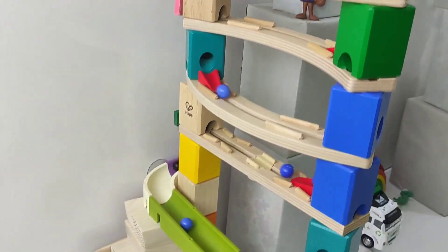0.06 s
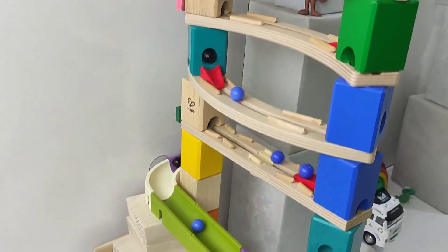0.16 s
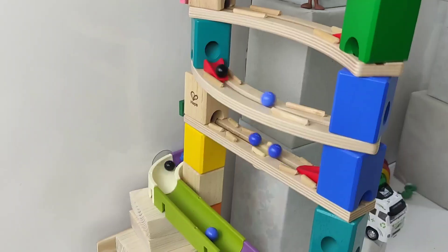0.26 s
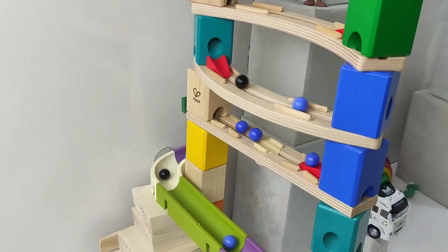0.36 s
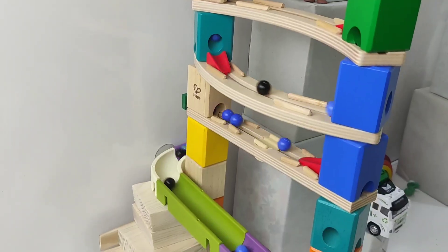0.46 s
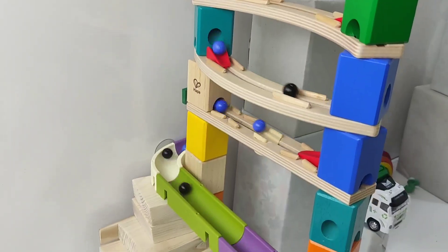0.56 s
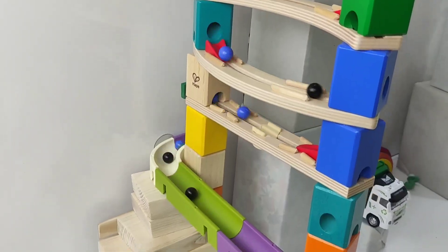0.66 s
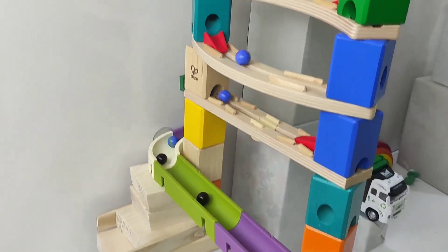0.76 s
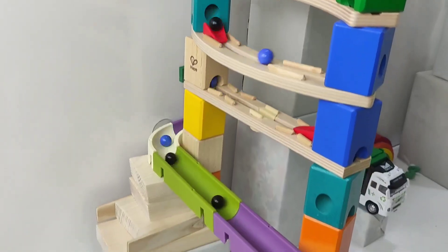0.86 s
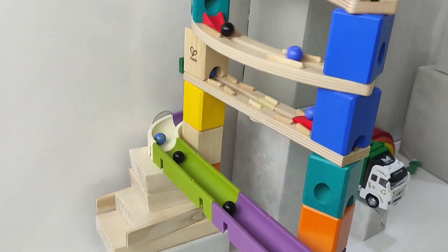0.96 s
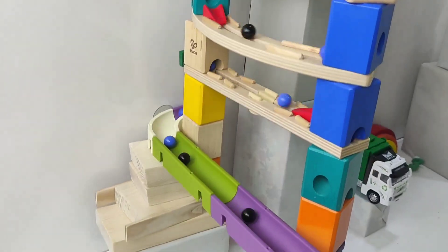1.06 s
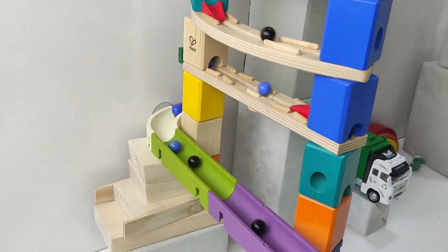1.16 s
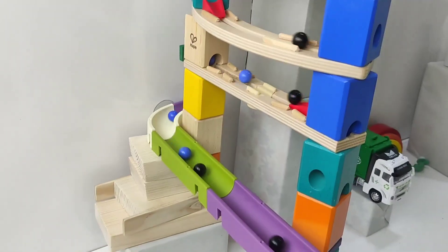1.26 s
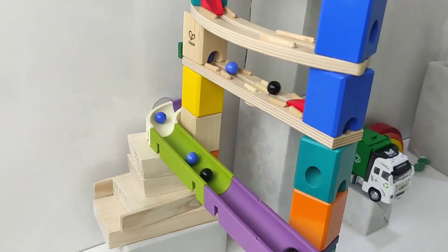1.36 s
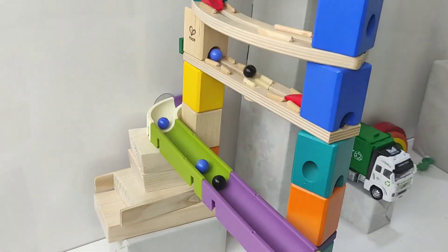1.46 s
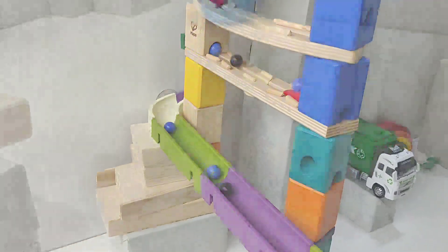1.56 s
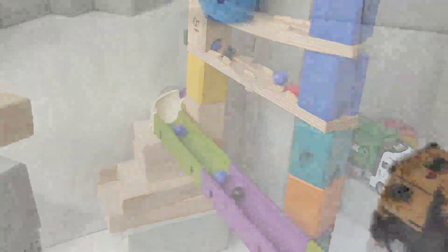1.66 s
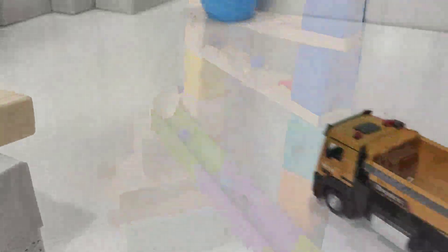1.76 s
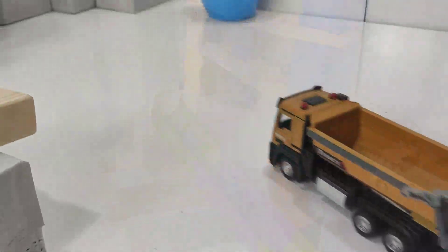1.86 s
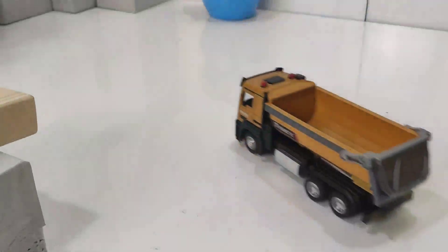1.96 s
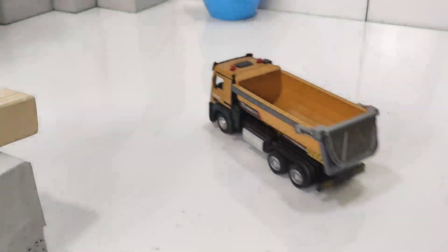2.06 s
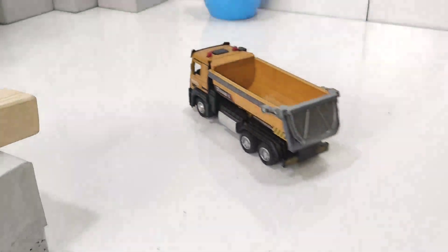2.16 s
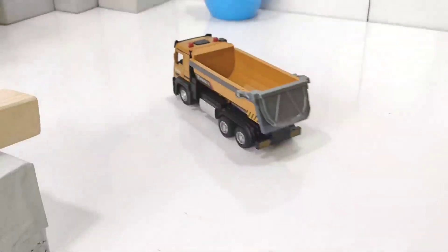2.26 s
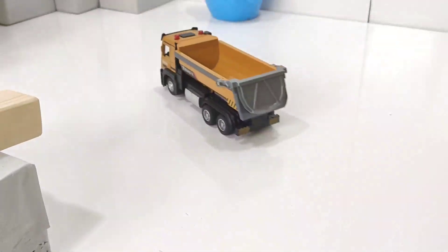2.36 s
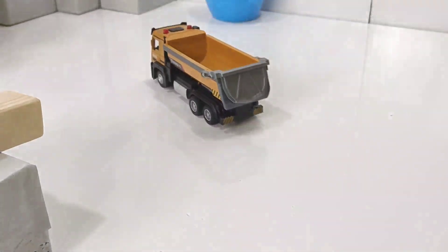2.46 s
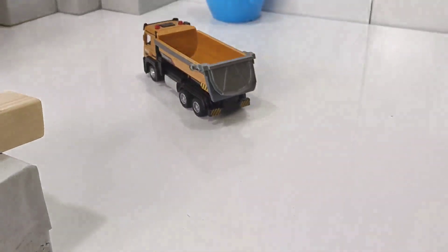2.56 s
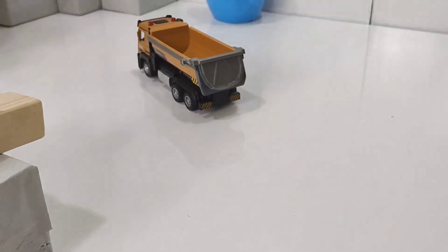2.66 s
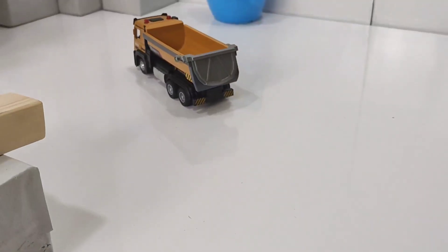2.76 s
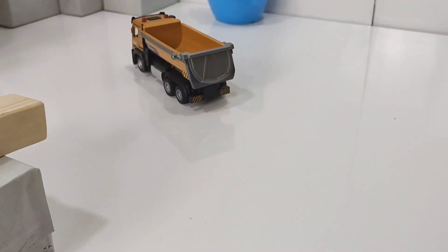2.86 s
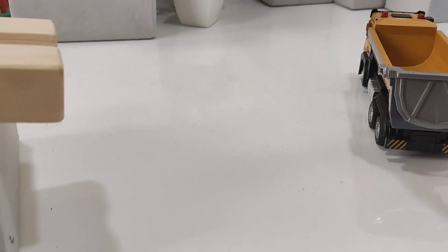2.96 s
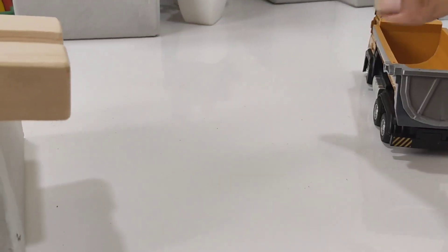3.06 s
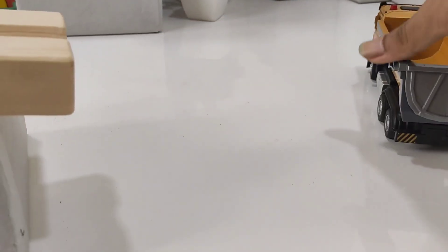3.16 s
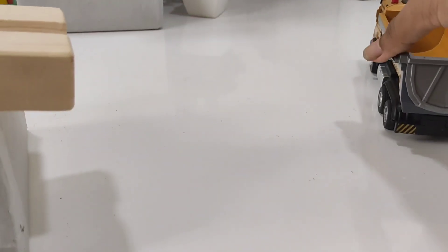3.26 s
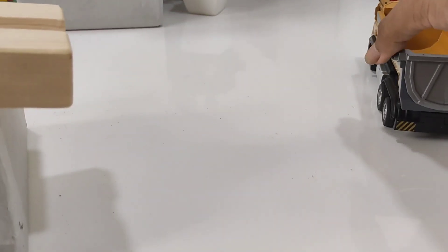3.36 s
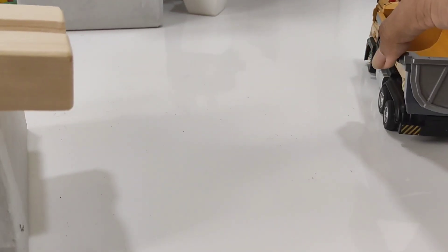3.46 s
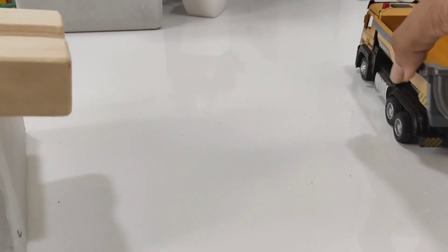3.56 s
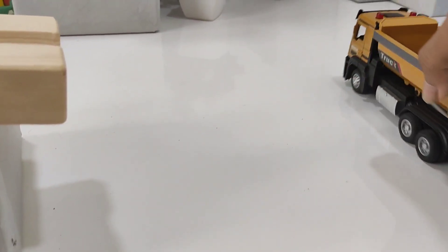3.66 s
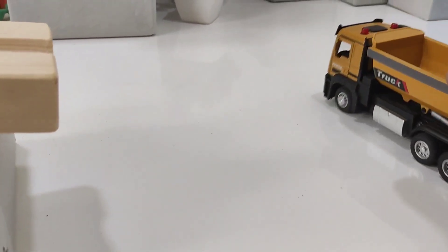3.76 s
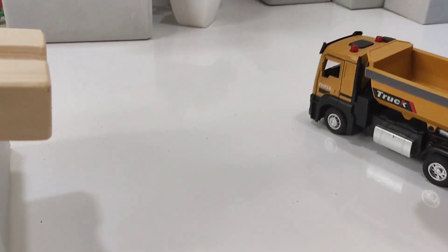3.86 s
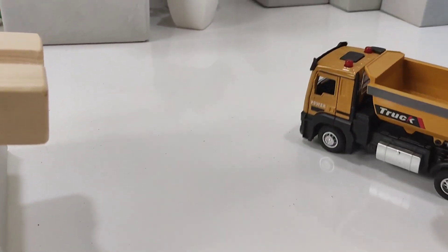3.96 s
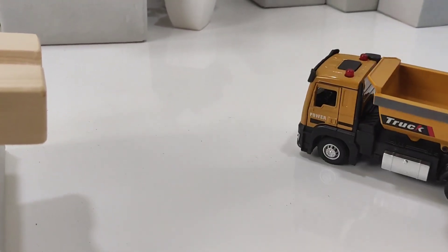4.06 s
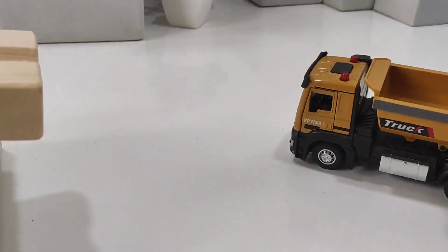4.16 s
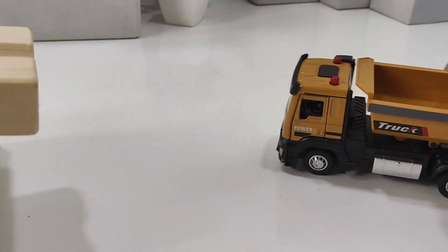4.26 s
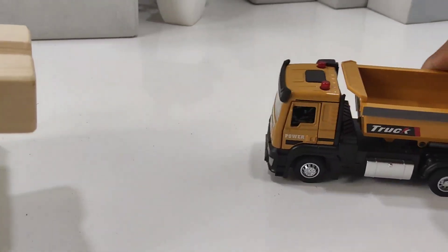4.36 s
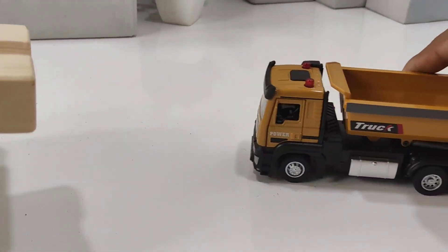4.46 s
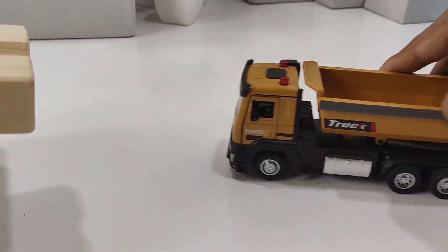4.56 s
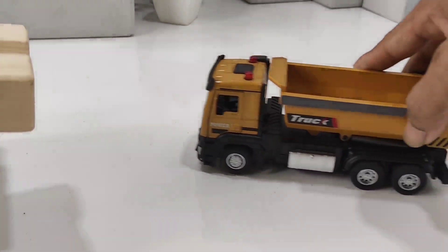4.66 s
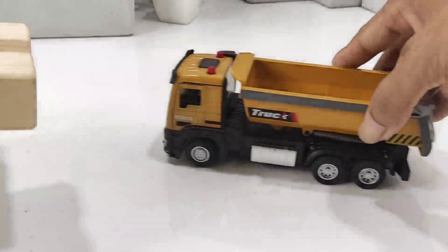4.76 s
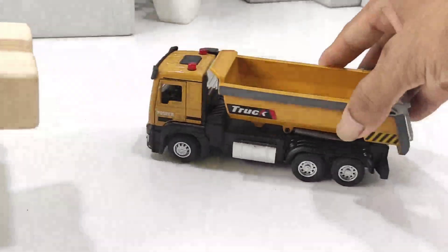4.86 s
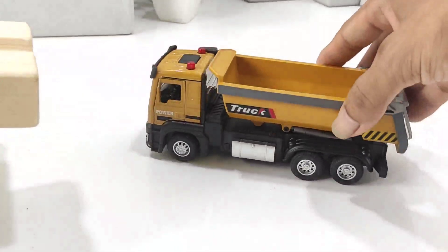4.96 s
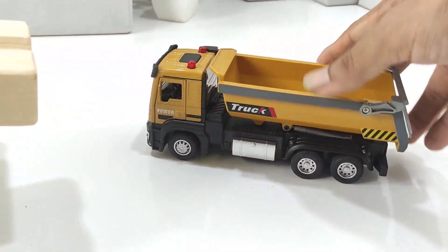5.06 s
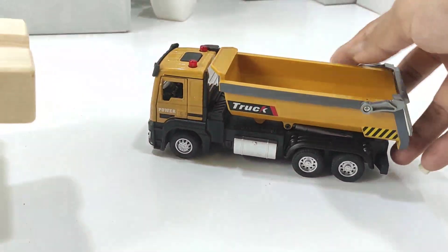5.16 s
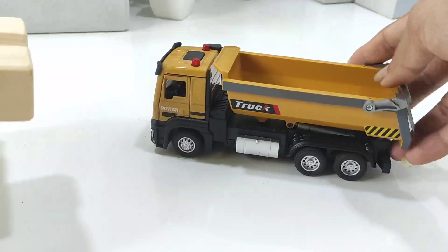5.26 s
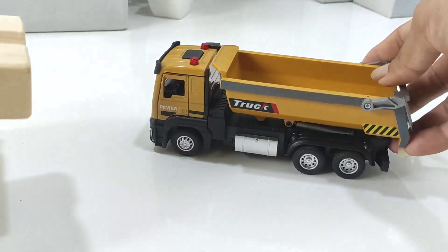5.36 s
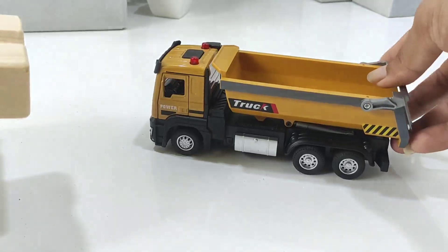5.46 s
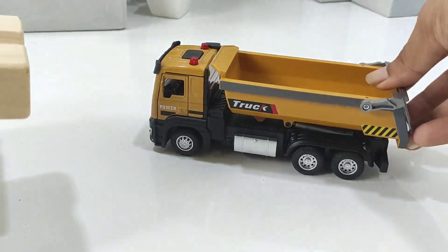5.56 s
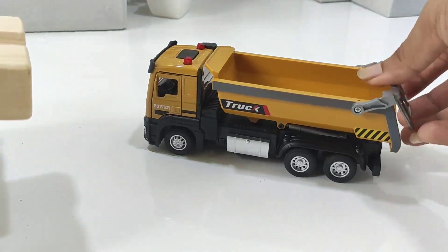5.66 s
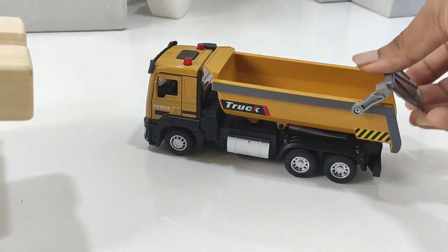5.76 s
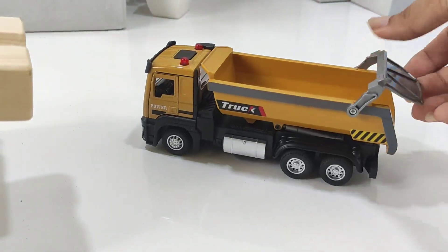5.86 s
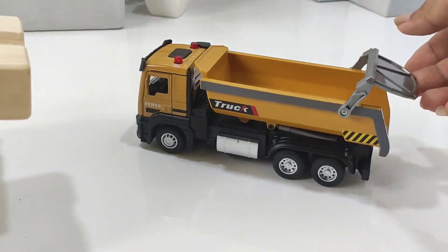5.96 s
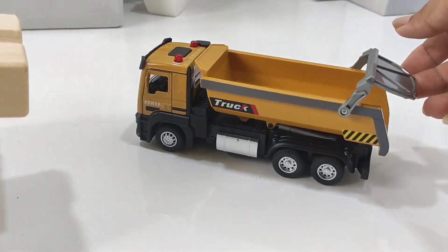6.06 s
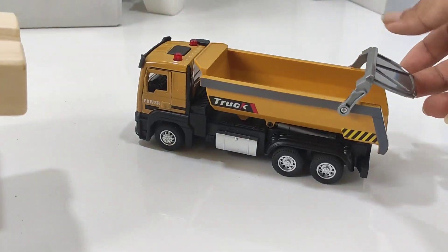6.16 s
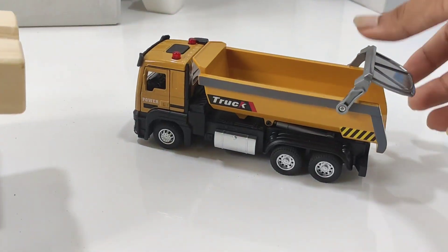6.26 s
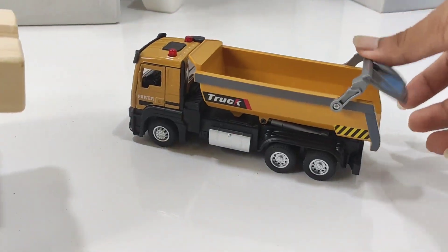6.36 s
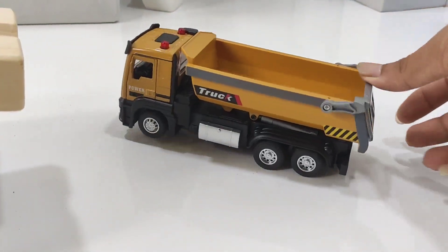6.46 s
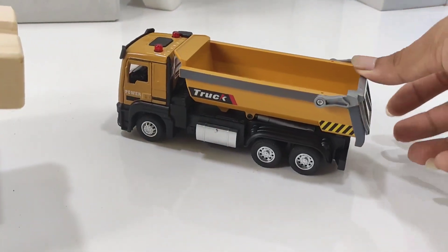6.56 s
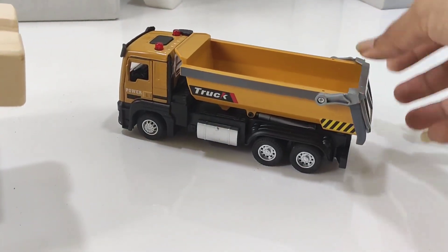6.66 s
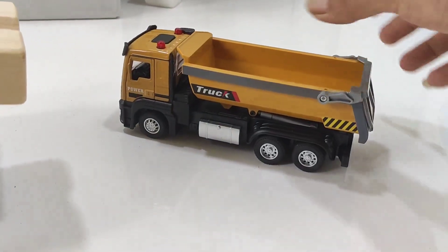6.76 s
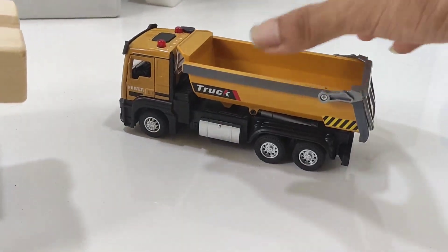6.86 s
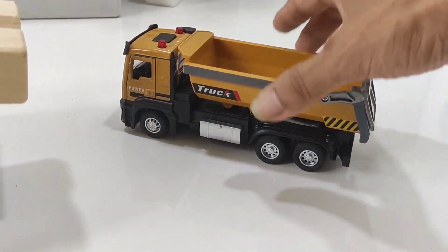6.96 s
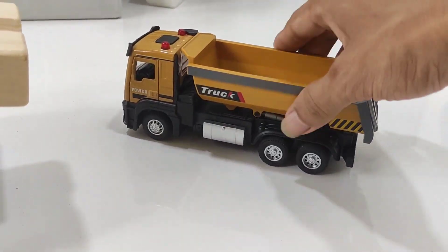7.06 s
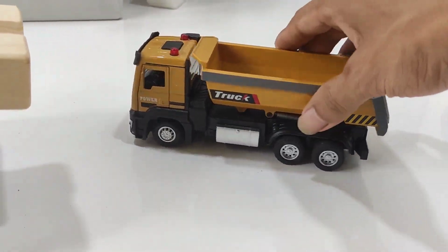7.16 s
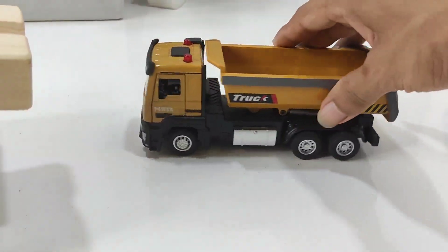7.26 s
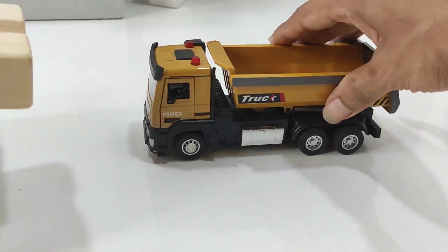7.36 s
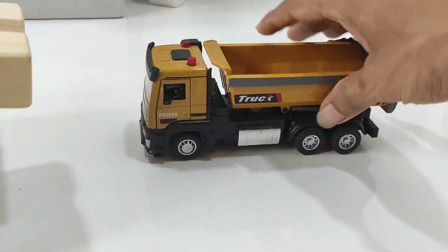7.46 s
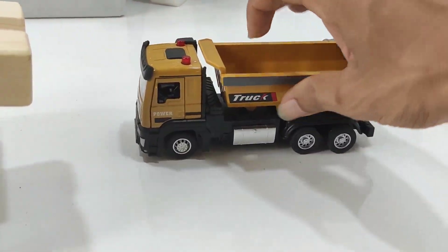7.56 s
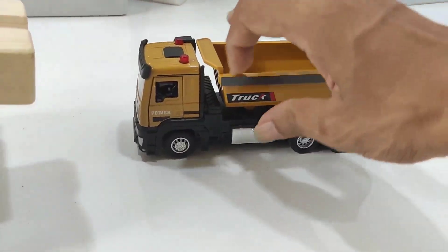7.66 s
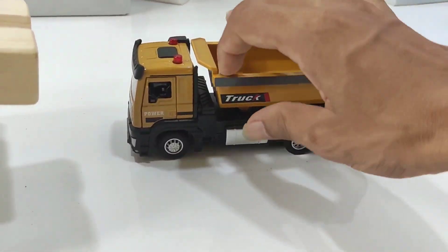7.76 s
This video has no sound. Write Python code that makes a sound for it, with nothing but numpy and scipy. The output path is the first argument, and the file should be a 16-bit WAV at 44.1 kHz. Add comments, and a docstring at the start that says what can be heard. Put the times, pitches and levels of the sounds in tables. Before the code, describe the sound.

Glass marbles clatter down a wooden run, then a plastic toy truck rolls over a hard table, clicks, and its tailgate slaps shut.

```python
"""Close by, glass marbles roll and clack down a wooden run with plastic chutes: shaped bursts ring wood and glass,
while strewn taps and a droning tower make the rolling. The room rings, over a steady noise floor.
As they run out a plastic toy truck rolls over a hard table (coloured rumble, whirr, hollow bumps) and is handled:
its shell clicks and scrapes as noise bursts ring its panels. Twice a low hum (one sine) swells.
Late on, the tailgate slaps shut and pushes the table, whose low modes ring."""
import sys
import numpy as np
from scipy import signal
from scipy.fft import rfft, irfft, next_fast_len
from scipy.io import wavfile
from scipy.ndimage import uniform_filter1d, map_coordinates

SR = 44100
rng = np.random.default_rng(int(sys.argv[2]) if len(sys.argv) > 2 else 0)


def inscribe(sig):
    """Save sig as 16-bit PCM at rate SR to the path in sys.argv[1].

    A 1-D sig is mono; a 2-D sig holds one channel per row.
    Samples are clipped to [-1, 1] before scaling.
    """
    pcm = np.round(np.clip(np.atleast_2d(sig).T, -1, 1) * 32767)
    wavfile.write(sys.argv[1], SR, pcm.astype(np.int16))


N = 343980
TIME = np.arange(N) / SR
HIT = TIME[:SR // 4]  # time axis of one contact, s

# Strength of the rolling marbles. Each row: time in seconds, strength in dB.
ROLLING_STRENGTH = [(0, 1), (.3, 0), (.65, 1.5), (0.851, -4), (1.302, 2), (1.55, -7), (1.77, -6),
                    (1.9, -27)]
# Modes of the wooden track. Each row: frequency in Hz, relative level in dB, t60 in seconds.
TRACK_MODES = [(497, 3, 0.028), (670, 3.5, 0.02), (976, -13, 0.034), (1192, 3.5, 0.019),
               (1343, -0.5, 0.022), (1700, -17, 0.0097), (1930, -1.5, 0.018), (2530, -12, 0.0276),
               (3554, 2.5, 0.007)]
# Modes of the long rails, which ring on after a knock. Each row: frequency in Hz, relative level in dB, t60 in s.
RAIL_MODES = [(715, 1, 0.22), (990, 6.5, 0.078), (1142, 0, 0.18), (1380, -7, 0.1), (1630, 4.5, 0.065),
              (1895, -1.5, 0.19), (3165, -13, 0.29), (3370, -6, 0.19)]
# Spectrum of glass contacts. Each row: frequency in Hz, relative level in dB.
GLASS_SPECTRUM = [(3000, -2), (4500, 4.5), (5800, 2.5), (7400, 6), (9600, 1), (10400, -6), (12100, -8),
                  (13500, -68.5)]
# Spectrum of dull, weighty thumps. Each row: frequency in Hz, relative level in dB.
THUMP_SPECTRUM = [(25, -53), (60, -7), (130, 8.5), (240, 5), (480, -4), (800, -4), (1500, -87)]
DRONE_FOLLOWS = 0.66  # dB of drone and landing thump for each dB of rolling strength


def amp(db):
    """Decibels to gain."""
    return 10 ** (np.asarray(db) / 20)


def unit(x):
    """Scale to rms 1."""
    return x / np.sqrt(np.mean(x ** 2) + 1e-20)


def crest(x):
    """Scale each channel so that its loudest 3 ms have rms 1."""
    power = uniform_filter1d(x ** 2, size=132)
    return x / np.sqrt(power.max(axis=-1, keepdims=True) + 1e-20)


def along(points, hz):
    """Interpolate (Hz, value) points on a log frequency axis."""
    f, v = np.transpose(points)
    return np.interp(np.log(hz + 1), np.log(f + 1), v)


def add(track, s, x):
    """Mix x into the track at time s."""
    start = max(round(s * SR), 0)
    part = track[:, start:start + x.shape[-1]]
    part += x[..., :part.shape[-1]]


def colour(x, spectrum):
    """Give x a spectrum, at rms 1."""
    n = x.shape[-1]
    m = next_fast_len(n + 2048)
    gain = amp(along(spectrum, np.fft.rfftfreq(m, 1 / SR)))
    return unit(irfft(rfft(x, m) * gain, m)[..., :n])


def noise(size):
    """White noise for two channels."""
    return rng.standard_normal((2, size))


def grains(rate, spread_db, size):
    """Tiny contacts of scattered strength at random times, rate per second on average."""
    strength = amp(spread_db * np.clip(rng.standard_normal(size), -2, 2))
    hits = (rng.random(size) < rate / SR) * strength
    envelope = signal.fftconvolve(hits, np.hanning(32))[:size]
    return unit(envelope * noise(size))


def ringing(modes):
    """Impulse response of a body: decaying sines, at new strengths and phases for each blow."""
    longest = max(t60 for _, _, t60 in modes)
    t = TIME[:int(SR * min(longest, 1))]
    out = np.zeros((2, len(t)))
    for hz, db, t60 in modes:
        # each mode reaches the second microphone about a quarter cycle early or late
        offset = rng.choice([-1, 1]) * rng.uniform(1 / 8, 3 / 8)
        phase = rng.random() + np.array([[0], [offset]])
        decay = amp(db + rng.standard_normal() - 60 * t / t60)
        out += decay * np.sin(2 * np.pi * (hz * t + phase)) * (1 - np.exp(-t * hz))
    return out


def resonate(x, modes):
    """A force x played through a body, at rms 1."""
    return unit(signal.fftconvolve(x, ringing(modes), axes=1)[:, :x.shape[-1]])


def bounce(x, echo=0.52):
    """The nearest surface returns the sound within a millisecond and notches its spectrum."""
    lags = rng.uniform(SR / 5000, SR / 1200, 2).astype(int)
    return x + echo * np.array([np.roll(channel, lag) for channel, lag in zip(x, lags)])


def burst(spectrum, hold, t60):
    """A contact that chatters for hold seconds and dies away."""
    shape = amp(-60 * np.maximum(HIT - hold, 0) / t60) * (1 - np.exp(-HIT / 0.00042))
    return crest(colour(bounce(noise(len(HIT))), spectrum) * shape)


def tap(spectrum, hold, t60, front_db):
    """A hard contact: one sharp spike, front_db relative to the energy of the chatter around it."""
    shape = amp(-60 * np.maximum(HIT - hold, 0) / t60) * (1 - np.exp(-HIT / 0.0015))
    force = noise(len(HIT)) * shape
    force /= np.linalg.norm(force, axis=1, keepdims=True)
    force[[0, 1], rng.integers(0, SR // 2500, 2)] += amp(front_db)
    # minimum phase: the filter adds nothing ahead of the spike
    log_gain = np.log(amp(along(spectrum, np.fft.rfftfreq(len(HIT), 1 / SR))))
    fold = irfft(log_gain, len(HIT))
    response = np.exp(rfft(2 * fold[:len(HIT) // 2], len(HIT)) - fold[0])
    return crest(irfft(rfft(bounce(force)) * response, len(HIT)))


def knock(spectrum, modes, hold, t60, ring_db, front_db):
    """A dry crack with the ring of the struck body, which builds up during the contact."""
    x = tap(spectrum, hold, t60, front_db)
    ring = ringing(modes)
    build_up = 1 - np.exp(-2 * TIME[:ring.shape[1]] / hold)
    add(x, 0, amp(ring_db) * crest(ring * build_up))
    return crest(x)


def push(hz):
    """One smooth cycle of pressure from a surface pushed in and springing back."""
    cycles = np.minimum(HIT * hz, 1)
    return np.sin(2 * np.pi * cycles) * np.sin(np.pi * cycles)


def swell(s, rise, hold, fade_db_per_s):
    """A gain that rises from time s, stays until hold seconds after s and then fades."""
    age = TIME - s
    return np.sin(np.pi / 2 * np.clip(age / rise, 0, 1)) * amp(-fade_db_per_s * np.maximum(age - hold, 0))


def wobble(rate):
    """A smooth random curve, rate knots a second."""
    return map_coordinates(rng.standard_normal(int(N * rate / SR) + 4), [TIME * rate])


def scattered(start, end, rate, db, bright_db, hz, spread_pitch=0.13):
    """Chance contacts, one in each 1 / rate seconds: rows (s, dB, brightness dB, Hz)."""
    slots = np.arange(start, end - 1 / rate, 1 / rate)
    when, pitch = rng.uniform(-1, 1, (len(slots), 2)).T
    times = slots + (when + 1) / 2 / rate
    pitches = hz * np.exp(2 * spread_pitch * pitch)
    return [(s, db, bright_db, note) for s, note in zip(times, pitches)]


def room(x, early_db, tail_db, early_t60):
    """Quick reflections from nearby surfaces, then the room's tail; the paths are redrawn three times a second."""
    # Decay of the bare room. Each row: frequency in Hz, t60 in seconds.
    room_decay = [(100, 0.5), (300, 0.5), (1000, 0.43), (3000, 0.49), (8000, 0.32), (14000, 0.32)]
    out = np.zeros((2, N))
    hz, t, z = signal.stft(noise(SR * 3 // 4), SR, nperseg=256)
    fade = amp(-60 * t / along(room_decay, hz)[:, None])
    for start in range(0, N, SR // 3):
        part = x[:, start:start + SR // 3]
        if np.abs(part).max() < 1e-6:
            continue
        diffuse = rng.standard_normal(z.shape) + 1j * rng.standard_normal(z.shape)
        tail = signal.istft(fade * diffuse, nperseg=256)[1]
        age = TIME[:tail.shape[1]]
        early = noise(len(age)) * amp(-60 * age / early_t60) * (age > .003)
        late = tail * (1 - np.exp(-age / 0.0033))
        paths = amp(tail_db) * unit(late) + amp(early_db) * unit(early)
        add(out, start / SR, signal.fftconvolve(part, paths / np.sqrt(len(age)), axes=1))
    return out


def under_way(x):
    """A running sound that has already filled the room when the scene begins."""
    wet = room(x, early_db=-3, tail_db=-2, early_t60=.07)
    return np.roll(x + wet, -SR // 2, axis=1)


def rolling_db():
    """Strength of the rolling in dB, dying away once the marbles have run out."""
    s, db = np.transpose(ROLLING_STRENGTH)
    return np.interp(TIME, s, db) - 300 * np.maximum(TIME - s[-1], 0)


def marble_hits(piece_db=8, piece_t60=0.021):
    """Marbles drop onto wood and clack against each other; each piece of track has its own note."""
    # Loud impacts. Each row: start in seconds, blow level in dB, glass click in dB relative to the blow
    # (before a small trim), pitch of the struck piece in Hz.
    marble_blows = [(0.045, -32, -17, 1440), (0.0642, -5.5, -15.5, 1370), (0.098, -13, -9.5, 1270),
                    (0.178, -22, 0, 1020), (0.185, -28.5, 6, 1110), (0.1994, -6.5, -12.5, 1340),
                    (0.264, -7.5, -16, 1380), (0.332, -21.5, -2.5, 1140), (0.374, -15.5, -11, 1520),
                    (0.4043, -9, -10, 1340), (0.447, -17, -17, 1410), (0.488, -28, -9, 1230),
                    (0.509, -11, -11, 1315), (0.61, -17.5, -6, 1340), (0.688, -38, 4, 1399),
                    (0.72, -17.5, -7.5, 1300), (0.744, -18.5, -23, 1280), (0.805, -16.5, -22, 1750),
                    (0.826, -16.5, -11, 1560), (0.853, -23.5, 2, 1320), (0.902, -32, 8.5, 1700),
                    (0.929, -28, 9.5, 905), (0.951, -16.5, -6.5, 1380), (1.01, -29, -2.5, 1270),
                    (1.065, -16, -21, 1760), (1.0852, -21, -27, 905), (1.0944, -4.5, -19.5, 1310),
                    (1.138, -15.5, -18, 1150), (1.15, -18, -20, 990), (1.176, -19, -16, 1390),
                    (1.19, -25, -8, 1360), (1.205, -33, -18, 1160), (1.2456, -15, -18, 1280),
                    (1.2965, -12, -10, 1220), (1.41, -23, -8.5, 1390), (1.463, -18, -16.5, 1730),
                    (1.479, -17.5, -36, 1740), (1.497, -26.5, 1.5, 1380), (1.506, -18.5, -27, 2000),
                    (1.54, -15.5, -24, 1740), (1.554, -24, -5.5, 1440), (1.566, -22.5, -7, 1200),
                    (1.621, -22.5, -2.5, 1190), (1.648, -19.5, -5.5, 1000), (1.693, -24.5, -5, 1140),
                    (1.731, -38, -24, 1510), (1.746, -24, -8.5, 880), (1.757, -24, -27, 1690),
                    (1.785, -21, -15.5, 1890), (1.831, -35, 2, 1510), (1.863, -22, -24, 2130),
                    (2.001, -26, -16, 1310)]
    # Dry crack of glass on wood. Each row: frequency in Hz, relative level in dB.
    clack_spectrum = [(40, -60), (200, -27), (600, 3), (1300, 3), (2100, 5.5), (3000, -6.5), (4800, -36.5),
                      (9000, -16.5), (13500, -65)]
    # Hard edge of a blow. Each row: frequency in Hz, relative level in dB.
    edge_spectrum = [(1200, -11.5), (2200, -3), (3000, 12), (3600, 10.5), (4100, 3.5), (5600, -72)]
    # Plastic chutes, rung by the glass. Each row: frequency in Hz before scatter, relative level in dB, t60 in s.
    chute_modes = [(3500, -3, 0.02), (4480, -5, 0.02), (6900, -1, 0.02), (7890, -1, 0.02), (8735, -2, 0.02),
                   (9700, -3, 0.02)]
    edge_db, hardening = -9.5, 0.37  # edge relative to a blow of 0 dB; its dB for each dB of blow
    ring_0_db, ring_softens = -8, 0.2  # ring of the wood at 0 dB; gentler blows are more ring than crack
    rail_db, shove_db = -22, -8  # rails, and the track giving way, relative to the blow
    landing_db = -36  # at rolling strength 0, the same for hard and soft blows
    # lesser collisions on the way down
    small = scattered(0, ROLLING_STRENGTH[-1][0], rate=16, db=-30.5, bright_db=-13.5, hz=1260)
    out, busy_db = np.zeros((2, N)), rolling_db()
    for s, db, click_db, hz in marble_blows + small:
        wood = amp(-6.5) * knock(clack_spectrum, TRACK_MODES + [(hz, piece_db, piece_t60)], hold=0.00099,
                                 t60=0.026, ring_db=ring_0_db - ring_softens * db, front_db=4)
        edge = amp(edge_db + hardening * db) * tap(edge_spectrum, hold=0.0023, t60=0.023, front_db=1)
        size = np.exp(0.0593 * rng.standard_normal())  # no two spots of a chute ring alike
        chute = [(f * size, level, t60) for f, level, t60 in chute_modes]
        click = knock(GLASS_SPECTRUM, chute, hold=.0025, t60=.024, ring_db=-5, front_db=-4)
        add(out, s, amp(db) * (wood + edge + amp(click_db + 0.5) * click))
        add(out, s, amp(db + shove_db) * push(hz))
        add(out, s, amp(db + rail_db) * crest(ringing(RAIL_MODES)))
        thump_db = landing_db + DRONE_FOLLOWS * busy_db[round(s * SR)]
        add(out, s, amp(thump_db) * burst(THUMP_SPECTRUM, hold=0.0034, t60=0.041))
    return out + room(out, early_db=-6.0, tail_db=-1.5, early_t60=0.046)


def marble_roll():
    """Rolling marbles tap over the grain and ribs of the track and set the tower droning."""
    # Rattle of the wood. Each row: frequency in Hz, relative level in dB.
    rattle_spectrum = [(150, -25), (250, 5.5), (307, 11.5), (393, -1), (686, -1), (888, 0.5), (1340, 4.5),
                       (1470, -13.5), (1880, -4.5), (2470, -1.5), (3190, -7), (5500, -13), (7150, -62),
                       (12100, -120)]
    # Modes of the hollow tower on the table. Each row: frequency in Hz, relative level in dB, t60 in seconds.
    tower_modes = [(101.5, -7, 0.51), (114.4, 2.5, 0.28), (208.7, 2.5, 0.19), (263, 1.5, 0.15),
                   (302.7, -1, 0.084)]
    rattle_db, drone_db, fizz_db = -34, -31.5, -39  # at strength 0, fizz at time 0; rattle and fizz before the room
    fizz_fade = 9  # dB per second: the glassy fizz fades as the run empties
    strength_db = rolling_db()
    taps = grains(rate=170, spread_db=2, size=N)
    ticks = grains(rate=400, spread_db=2, size=N)
    body = amp(-6) * resonate(taps, TRACK_MODES) + amp(-14) * resonate(taps, RAIL_MODES)
    wood = unit(colour(taps, rattle_spectrum) + body)
    fizz = colour(ticks, GLASS_SPECTRUM)
    drone = unit(resonate(noise(N), tower_modes) + amp(-7.5) * colour(noise(N), THUMP_SPECTRUM))
    return (amp(rattle_db + strength_db) * under_way(wood)
            + amp(fizz_db + strength_db - fizz_fade * TIME) * under_way(fizz)
            + amp(drone_db + DRONE_FOLLOWS * strength_db) * drone)


def background(hum_hz=86, floor_db=-51):
    """Steady room noise, and a low sine hum that swells twice."""
    # Swells of the hum. Each row: start in seconds, held until seconds after the start, rms level in dB.
    hum_swells = [(2.51, 0.097, -41.5), (5.07, 0.19, -37.5)]
    # Noise floor of the place. Each row: frequency in Hz, relative level in dB.
    quiet_spectrum = [(15, -51), (25, -51.5), (69, -7), (122, -7.5), (267, -9), (322, -10), (598, -21),
                      (648, -18), (1170, -23), (1340, -23), (1800, -23), (2420, -28), (6730, -37.5),
                      (8130, -37), (15500, -41.5)]
    level = sum(amp(db) * swell(s, rise=0.16, hold=held, fade_db_per_s=59) for s, held, db in hum_swells)
    hum = level * np.sqrt(2) * np.sin(2 * np.pi * hum_hz * TIME)
    return hum + amp(floor_db) * colour(noise(N), quiet_spectrum)


def truck_roll():
    """Each push gets the truck moving, it coasts and stops; wheels rumble, the chassis bumps, axles whirr
    unevenly."""
    # Moves. Each row: start in s, pushed for s, then coasts for s, wheel rumble in dB, axle whirr in dB
    # (both before a small trim).
    truck_moves = [(1.78, 0.26, 0.65, -44, -44.5), (3.27, 0.073, 0.13, -46.5, -75),
                   (3.6, 0.41, 0.12, -48.5, -60.5), (4.7, 0.067, 0.47, -49.5, -62),
                   (5.9, 0.26, 0.157, -54, -83), (6.5, 0.23, 0.12, -47.5, -66.5),
                   (7.0, 0.55, 0.13, -54.5, -66.5)]
    # Dull bumps of the wheels and of the rocking chassis. Each row: start in seconds, thud in dB, hollow knock
    # in dB, pitch of the knock in Hz.
    truck_bumps = [(2.103, -44, -30.5, 400), (2.251, -42.5, -32.5, 460), (2.434, -40.5, -35.5, 690),
                   (2.535, -57, -42, 300), (2.688, -47, -46, 270), (3.334, -38, -58, 300),
                   (3.781, -47, -41, 300), (4.56, -41, -39.5, 340), (4.813, -44.5, -44, 310),
                   (5.925, -41, -52, 300), (6.104, -37, -41.5, 277), (6.442, -43.5, -62, 350),
                   (6.54, -34, -35.5, 800), (6.564, -56, -34, 480), (6.682, -46, -35, 260),
                   (7.465, -52, -45.5, 480), (7.5, -47.5, -44, 330)]
    # A bump jolts the axles in turn. Each row: delay in seconds, level in dB relative to the hollow knock.
    axle_jolts = [(0, -3), (0.013, -3.5), (0.024, -2.5)]
    # Modes of the hollow chassis. Each row: frequency in Hz, relative level in dB, t60 in seconds.
    chassis_modes = [(256.6, -6, 0.21), (434, -4, 0.033), (732, -10.5, 0.027)]
    # Axle whirr. Each row: frequency in Hz, relative level in dB.
    whirr_spectrum = [(240, -7), (400, 4.5), (623, -9.5), (1020, -21), (1560, -11.5), (1960, -17),
                      (2710, -9), (6580, -13.5), (7210, -17.5), (12100, -13.5), (15500, -39.5)]
    # Wheel rumble on the table. Each row: frequency in Hz, relative level in dB.
    wheel_spectrum = [(35, -57), (60, 5.5), (134, 14.5), (199, 6), (247, 12), (325, 3.5), (385, -15),
                      (768, -34), (900, -39), (1170, -48), (1980, -120)]
    start_s, coast_fade, brake_fade = 0.02, 15, 101  # getting up to speed; slowing freely, being stopped (dB/s)
    rumble, whirr, jolts = np.zeros(N), np.zeros(N), np.zeros((2, N))
    for s, pushed, coasts, rumble_db, whirr_db in truck_moves:
        coasting = swell(s, start_s, pushed, coast_fade)
        speed = coasting * swell(s, start_s, pushed + coasts, brake_fade)
        rumble += amp(rumble_db) * speed
        whirr += amp(whirr_db) * speed
    ticks = amp(2.5 * wobble(45)) * grains(rate=300, spread_db=3, size=N)
    out = amp(-2.0) * whirr * colour(ticks, whirr_spectrum)
    out += amp(-3.0) * rumble * colour(noise(N), wheel_spectrum)
    for s, thud_db, hollow_db, hz in truck_bumps:
        add(out, s, amp(thud_db) * burst(THUMP_SPECTRUM, hold=0.021, t60=0.064))
        for delay, db in axle_jolts:
            hollow = crest(ringing(chassis_modes + [(hz, 2, 0.025)]))
            add(jolts, s + delay, amp(hollow_db + db) * hollow)
    return out + jolts + room(out + amp(-12) * jolts, early_db=0.5, tail_db=-0.5, early_t60=0.054)


def truck_handling(panel_db=6, panel_t60=0.025, softness=0.82, most_ring_db=5):
    """Fingers and loose parts click and scrape on the hollow plastic shell."""
    # Clicks and knocks. Each row: start in seconds, level in dB, snap in dB relative to it, touched panel's
    # pitch in Hz (shell and snap are then trimmed a little).
    shell_clicks = [(1.965, -49.5, 16, 1460), (2.067, -44.5, 11, 1290), (2.18, -45, -2, 1520),
                    (2.254, -50, 14, 1430), (2.658, -50, 3, 1477), (3.283, -37, -5, 1770),
                    (3.309, -40, -17, 1600), (3.339, -33, -41, 1120), (3.355, -37, -5, 2380),
                    (3.374, -31.5, -26, 1800), (3.381, -35, -23, 2760), (3.443, -33.5, -26, 2120),
                    (3.462, -37.5, -29, 1740), (3.505, -43.5, -30, 1990), (3.561, -45.5, -5, 2050),
                    (3.629, -44, -3.5, 2080), (3.653, -49.5, 8, 1290), (3.745, -33.5, -14, 2180),
                    (3.783, -39.5, -25, 1350), (3.801, -46, 3, 1580), (4.024, -22.5, -16.5, 1660),
                    (4.031, -18.5, -21.5, 1560), (4.0604, -19, -12.5, 1606), (4.338, -43.5, -20, 1820),
                    (4.395, -49, 0.5, 1280), (4.46, -45.5, -29, 1690), (4.501, -43, -9, 1460),
                    (4.587, -38, -16, 1660), (4.761, -37, -12, 1140), (4.786, -40, 1, 2330),
                    (4.791, -32, -19, 1593), (5.517, -44.5, 1, 1670), (5.629, -43, -28, 1770),
                    (5.651, -46.5, 3, 1590), (5.691, -44.5, 4, 1960), (5.77, -36, -11, 1295),
                    (5.775, -26.5, -13, 1750), (5.933, -31, -25.5, 1940), (5.969, -35.5, -18, 1960),
                    (6.1134, -23, -9.5, 1260), (6.441, -33.5, -14, 1090), (6.458, -27.5, -31, 1800),
                    (6.524, -28, -3, 1720), (6.539, -19, -10, 780), (6.569, -20, -12, 2000),
                    (6.6379, -10.5, 0, 1486), (6.64, -11.5, -14, 2120), (7.196, -40.5, 2.5, 1660),
                    (7.229, -27, 1, 1120), (7.382, -33.5, -28, 1880), (7.405, -47, -20, 1560),
                    (7.428, -31.5, -30, 1810), (7.442, -36.5, -3.5, 3430), (7.496, -55, 3.5, 1500),
                    (7.561, -32.5, -30, 2000), (7.786, -21.5, -1, 1060)]
    # Ticks of the axle as the truck coasts. Each row: start in s, level in dB, relative snap in dB, pitch in Hz.
    axle_ticks = [(4.848, -39, -10, 1520), (4.872, -41, -1.5, 1800), (4.903, -39.5, -3, 1880),
                  (4.936, -48.5, 11, 1660), (4.972, -43, 7.5, 2040)]
    # Spells of loose parts ticking. Each row: from seconds, to seconds, level in dB, relative snap in dB.
    jiggle_spells = [(2.151, 3.083, -53.5, 9.5), (3.683, 3.88, -47, -20), (5.578, 5.749, -51, -1)]
    # Plastic sliding on plastic. Each row: start in seconds, length in seconds before it dies away,
    # shell level in dB, hiss in dB above the shell, rubbed panel's pitch in Hz.
    plastic_scrapes = [(2.315, 0.055, -57.5, 11, 1490), (2.393, 0.14, -50.5, -1.5, 1630),
                       (3.348, 0.037, -49.5, -13, 1700), (3.889, 0.03, -32.5, -23, 1764),
                       (4.64, 0.013, -49.5, -6.5, 1640), (5.12, 0.12, -72, 13, 1690),
                       (5.778, 0.034, -49, -12, 1820),  (5.944, 0.023, -42, -25, 1850),
                       (6.468, 0.078, -54.5, -6, 1880), (6.518, 0.045, -31, -10.5, 1730),
                       (6.531, 0.014, -27, -4, 1280), (7.149, 0.0126, -42, -20, 1630),
                       (7.19, 0.01, -34, -34, 1630), (7.232, 0.03, -49.5, 4, 1650)]
    # Modes of the truck's shell. Each row: frequency in Hz, relative level in dB, t60 in seconds.
    shell_modes = [(1116, -1.5, 0.017), (1300, 4, 0.012), (1592, -6.5, 0.024), (1755, -17.5, 0.049),
                   (1950, -1.5, 0.019), (2300, -4, 0.016), (2796, -12, 0.02), (3320, -8.5, 0.022)]
    # Modes of the open tipper bed, ringing longer. Each row: frequency in Hz, relative level in dB, t60 in s.
    bed_modes = [(1260, 0, 0.074), (1630, 2, 0.12), (1720, 0, 0.25), (1890, -4, 0.15), (2430, -15, 0.37),
                 (2930, -9, 0.12), (3510, -12, 0.068), (4200, -4, 0.11)]
    # Crack of the shell. Each row: frequency in Hz, relative level in dB.
    crack_spectrum = [(40, -35), (200, -15.5), (500, 1), (850, 0.5), (1250, 4.5), (2000, 2.5), (2500, -1.5),
                      (3800, -1), (5500, -12), (8000, -24)]
    # Snap and hiss of plastic. Each row: frequency in Hz, relative level in dB.
    plastic_spectrum = [(2000, -2), (3600, -1), (5500, 4.5), (7300, -2), (8800, 3), (11000, 1.5),
                        (13500, -5.5), (16000, -43.5)]
    front_db = -5  # first spike of a plastic contact
    bed_db, thump_db = -19, -14  # bed ring and chassis thump under every click, relative to its level
    crackle_db, harshness = 2, 0.44  # crackle at 0 dB of hiss; its dB for each dB of hiss
    out = np.zeros((2, N))
    jiggles = []
    for start, end, db, snap_db in jiggle_spells:
        jiggles += scattered(start, end, rate=12, db=db, bright_db=snap_db, hz=1760)
    for s, db, snap_db, hz in shell_clicks + axle_ticks + jiggles:
        # a soft touch has little snap and leaves mostly the ring of the panel
        ring_db = min(-8.0 - softness * snap_db, most_ring_db)
        shell = knock(crack_spectrum, shell_modes + [(hz, panel_db, panel_t60)], hold=0.0055, t60=0.014,
                      ring_db=ring_db, front_db=front_db)
        snap = amp(snap_db - 3.5) * tap(plastic_spectrum, hold=0.0045, t60=0.012, front_db=front_db)
        thump = amp(thump_db) * burst(THUMP_SPECTRUM, hold=0.0067, t60=0.025)
        add(out, s, amp(db) * (amp(-4) * shell + snap + thump))
        add(out, s, amp(db + bed_db) * crest(ringing(bed_modes)))
    for s, length, db, hiss_db, hz in plastic_scrapes:
        stroke = np.clip(HIT / 0.004, 0, 1) * amp(-60 * np.maximum(HIT - length, 0) / 0.059)
        slips = grains(rate=1500, spread_db=2, size=len(HIT))
        # gentle rubbing sings in the panel; hard rubbing is mostly crackle
        crackle = amp(crackle_db + harshness * hiss_db) * colour(slips, crack_spectrum)
        shell = unit(resonate(slips, shell_modes + [(hz, 7, .028)]) + crackle)
        hiss = amp(hiss_db) * colour(slips, plastic_spectrum)
        add(out, s, amp(db) * stroke * (shell + hiss))
    return out + room(out, early_db=-6.5, tail_db=-8.5, early_t60=0.18)


def table_boom(push_hz=140):
    """The tailgate's slap pushes the table top down once, and it rings low."""
    # The slap, a single row: start in seconds, push in dB, gain of the ring in dB.
    tailgate_slap = (6.6395, -9.5, -30.5)
    # Modes of the table. Each row: frequency in Hz, relative level in dB, t60 in seconds.
    table_modes = [(87.5, -1, 0.6), (110.6, 5.5, 0.82), (130.9, 2.5, 0.66), (178, 3, 0.52), (208.4, 3, 0.3),
                   (245, 8, 0.33), (300, -2, 0.22)]
    out, t = np.zeros((2, N)), TIME[:SR]
    s, push_db, ring_db = tailgate_slap
    ring = sum(amp(db - 60 * t / t60) * np.sin(2 * np.pi * hz * t) for hz, db, t60 in table_modes)
    add(out, s, amp(push_db) * push(push_hz))
    add(out, s, amp(ring_db) * ring * (1 - np.exp(-t / 0.003)))
    # a small table radiates little deep bass
    return signal.sosfilt(signal.butter(4, 110, "high", fs=SR, output="sos"), out)


def scene():
    """All sources at two close microphones, which hear most of the bass nearly alike."""
    # Stereo width. Each row: frequency in Hz, gain of the side signal in dB.
    stereo_width = [(30, -15), (70, -1.5), (120, -15.5), (220, -9.5), (400, -4.5), (800, -2.5),
                    (1500, -0.5), (12000, 0)]
    marbles = marble_hits() + marble_roll()
    truck = truck_roll() + truck_handling() + table_boom()
    left, right = marbles + background() + truck
    mid = (left + right) / 2
    side_gain = amp(along(stereo_width, np.fft.rfftfreq(N, 1 / SR)))
    side = irfft(rfft((left - right) / 2) * side_gain, N)
    return np.array([mid + side, mid - side])


def record(dry):
    """The microphones lose the deepest bass; the sound clips at full scale, then stops at a band limit."""
    top_hz = 15700
    x = signal.sosfilt(signal.butter(2, 40, "high", fs=SR, output="sos"), dry)
    m = next_fast_len(N + SR // 4)
    in_band = np.fft.rfftfreq(m, 1 / SR) < top_hz
    return irfft(rfft(np.clip(x, -1, 1), m) * in_band, m)[:, :N]


dry = scene()
out = record(dry)
inscribe(out)
```